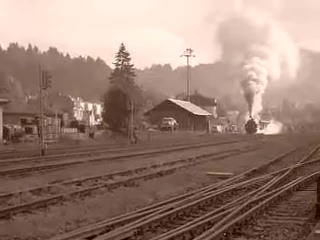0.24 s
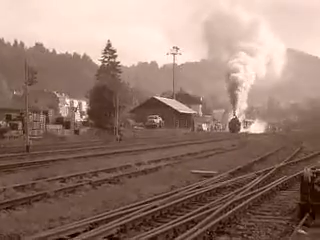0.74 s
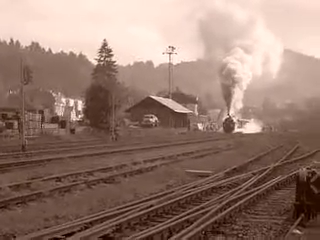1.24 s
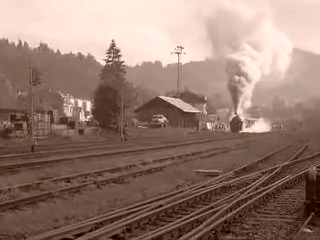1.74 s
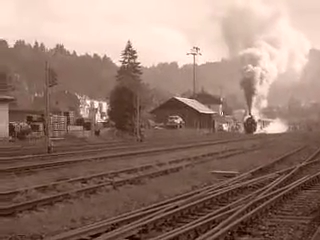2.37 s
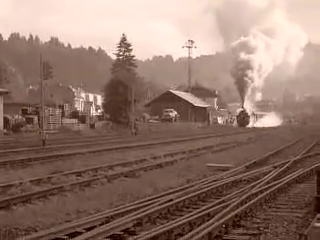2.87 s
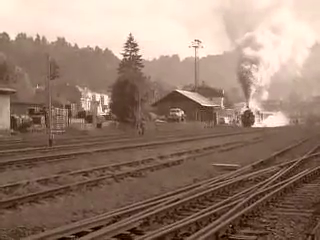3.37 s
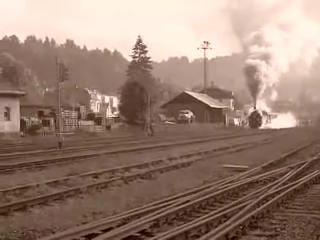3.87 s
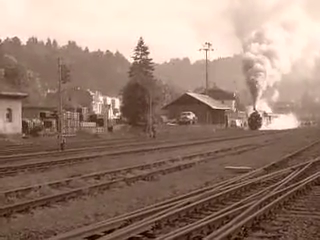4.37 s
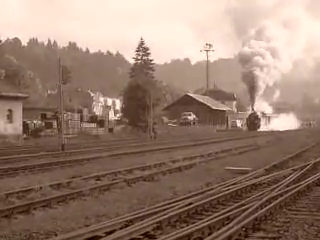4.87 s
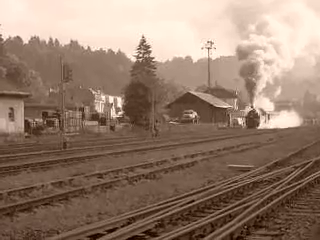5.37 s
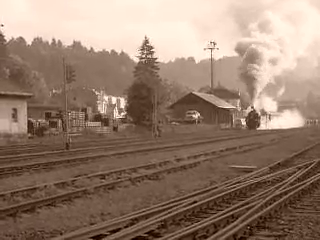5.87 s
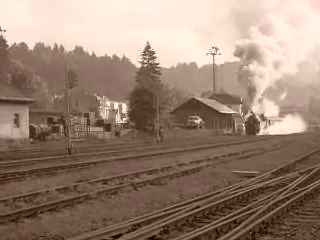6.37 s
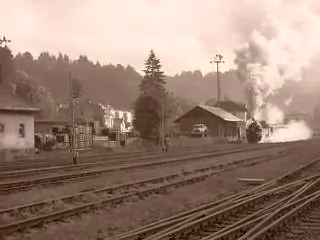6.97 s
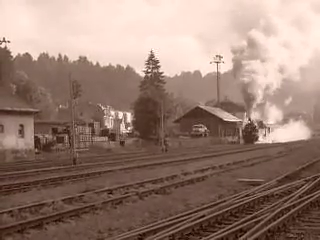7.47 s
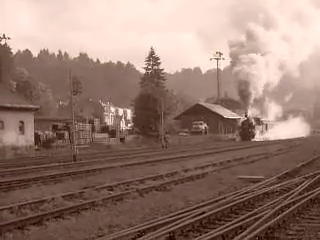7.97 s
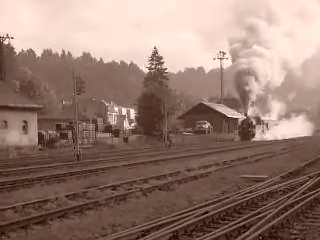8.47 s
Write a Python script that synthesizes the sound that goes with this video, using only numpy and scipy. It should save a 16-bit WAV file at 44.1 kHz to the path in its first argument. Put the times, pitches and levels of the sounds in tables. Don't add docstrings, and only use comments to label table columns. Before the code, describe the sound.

From 0 s a steam locomotive is already working some way off in an open rail yard, heard through a thin-sounding mono camera microphone. Strong, ringing steam hiss centred near 3 kHz swells about every 0.9 s at first, with crests near 0.7, 1.5, 2.5 and 3.4 s, small spurts between, over constant seep. Underneath, blurred woolly chuffs beat just over four per second, quickening to nearly six, with low roar and slight echo. By 3-5 s the jets are clearly stronger; faint low firebox drumming and flue notes stay buried. After 5.4 s the hiss changes colour as the far-side jet emerges, its hollow notches sliding slowly downward. Surges come every 0.75 s, with tiny ticks near 5.9, 6.1 and 7.2 s. From 7 s it grows wider, fizzier and loudest, a faint moan below. A brief, falling leak whistle near 1.4 kHz appears at 8.6 s, ending mid-approach at 8.7 s.

```python
import sys
import numpy as np
from scipy import signal
from scipy.fft import rfft, irfft, next_fast_len
from scipy.io import wavfile
from scipy.ndimage import uniform_filter1d

SR = 44100
rng = np.random.default_rng(int(sys.argv[2]) if len(sys.argv) > 2 else 0)


def invert_db(level):
    return 10 ** (np.asarray(level, dtype=float) / 20)


def unload_wav(signal):
    wavfile.write(
        sys.argv[1],
        SR,
        np.round(np.clip(np.atleast_2d(signal).T, -1, 1) * 32767).astype(np.int16),
    )


N = 384993

# time in seconds, gain over the start in dB.
APPROACH = [(0, -1.5), (.6, 1), (2.5, 2.5), (4.2, 3.5), (6.6, 4.5), (7.2, 6), (8.73, 8.5)]
JET_BANDS = [
    (2650, 3800),
    (1950, 2650),
    (4200, 6800),
    (7300, 10500),
]
# pitch in Hz, level in dB per Hz.
JET_COLOUR = [(1000, -56), (1700, -28), (2120, -26.5), (2540, -10), (2940, 3), (3240, 0.5), (3720, -13.5),
              (4150, -19), (4700, -23), (6070, -30), (7500, -39), (9400, -47.5), (10500, -57),
              (12100, -78.5), (14000, -120)]
# opening, crest and closing in seconds, core and shoulder level in dB.
STROKES = [(-0.45, -0.2, -0.06, -21.9, -43.2), (0.44, 0.7, 0.76, -20.1, -40.0),
           (1.34, 1.51, 1.68, -18.4, -39.8), (2.22, 2.5, 2.77, -19.1, -39.8),
           (3.07, 3.37, 3.54, -14.9, -35.5), (3.95, 4.15, 4.35, -13.2, -36.6),
           (4.72, 4.98, 5.04, -14.6, -35.7), (5.52, 5.72, 5.83, -15.6, -37.7),
           (6.3, 6.42, 6.59, -14.8, -35.1), (7.05, 7.1, 7.35, -14.2, -32.2),
           (7.76, 7.94, 8.06, -14.9, -31.9), (8.48, 8.67, 8.75, -14.8, -30.9)]
# crest in seconds, core level in dB.
SPURTS = [(0.28, -27.0), (1.22, -25.1), (1.87, -23.4), (2.1, -21.3), (2.97, -20.1), (3.82, -20.0),
          (4.63, -21.4), (5.4, -20.7), (6.17, -22.9), (6.89, -22.8), (7.63, -20.2), (8.35, -20.7)]
# opening, full flow and shutting in seconds,
# fizz level in dB, level of the spit at the end in dB.
LEAKS = [(0.44, 0.7, 1.12, -57.3, -75.0), (1.3, 1.56, 2.06, -54.4, -57.4), (2.18, 2.62, 2.92, -53.2, -52.9),
         (3.02, 3.49, 3.73, -50.1, -51.6), (3.95, 4.31, 4.54, -55.2, -54.7),
         (4.61, 5.14, 5.33, -53.8, -59.9), (5.53, 5.7, 6.1, -52.2, -62), (6.23, 6.55, 6.84, -51.5, -52.5),
         (6.97, 7.43, 7.58, -47.1, -44.1), (7.67, 8.14, 8.33, -43.9, -51.4),
         (8.37, 8.74, 8.8, -43.3, -58.5)]
# pitch in Hz, width in Hz.
FLANKS = [(2580, 150), (3850, 380)]
# time in seconds, share of the far-side jet 0-1, ground echo strength 0-1,
# pitch in Hz below which the boiler shades the far side.
GROUND = [(0, .05, .77, 9000), (4.6, .05, .85, 9000), (5.3, .08, .72, 9000), (5.42, .9, .7, 9000),
          (7.1, .93, .8, 6500), (7.6, .97, .8, 5200), (8.73, 1, .68, 4000)]
# time in seconds, near-side and far-side jet in Hz.
NOTCH_SPACING = [(0, 2910, 2800), (3, 2790, 2650), (4.6, 2645, 2550), (7, 2570, 2420), (8.73, 2480, 2245)]
# lateness in seconds, strength in dB, brightness in dB.
TURN_BEATS = [(-0.0056, -37.5, -0.5), (-.01, -38.5, -2), (0, -38, 0), (0, -39.5, -2)]
# pitch in Hz, level in dB per Hz.
BLAST_COLOUR = [(15, -53.5), (25, -26), (53, -18), (75, -15.5), (182, -15), (328, -17), (516, -5.5),
                (600, -6), (753, -2), (1020, -11), (1260, -5), (1460, -7), (1670, -12.5), (2090, -11.5),
                (2300, -8), (2990, -27.5), (5060, -120)]
# time in seconds, pitch in Hz, level in dB.
FIREBOX_DRONE = [(0, 50, -64), (1.53, 47, -66), (2.14, 47.5, -58), (2.33, 47, -70), (2.75, 48.5, -59),
                 (3.2, 48, -57), (3.5, 48, -67), (3.88, 48.5, -57), (4.1, 48, -69), (4.62, 51.9, -50),
                 (5.13, 51.2, -64), (5.4, 50.7, -54), (5.91, 50.8, -62), (6.95, 54.3, -57),
                 (7.5, 54.5, -63), (7.95, 55.4, -56), (8.73, 56.3, -59)]
# time in seconds, pitch in Hz, level in dB.
FLUE_NOTE = [(1.7, 237, -64), (2, 235.6, -57), (2.6, 231, -66.5), (3.1, 224.4, -55), (3.6, 224, -69.5),
             (4.4, 230.5, -60), (4.8, 227, -80)]
# time in seconds, peak in dB, lower part against the peak in dB.
TICKS = [(3.3505, -35, -8), (3.4256, -36, -8), (5.8556, -31, 4), (6.0888, -26, 7), (7.1552, -21, 5)]
# time in seconds, pitch in Hz, level in dB.
FLUE_MOAN = [(6.7, 190, -70), (6.9, 188, -59), (7.3, 172, -61), (7.7, 172, -61), (8.1, 183, -57),
             (8.73, 180, -56)]
# time in seconds, pitch in Hz, level in dB.
LEAK_WHISTLE = [(8.58, 1470, -68), (8.61, 1480, -38), (8.67, 1450, -32), (8.73, 1410, -42.5)]


def evened(x):
    return x / np.sqrt(np.mean(x ** 2) + 1e-20)


def read(points, hz):
    f, value = np.transpose(points)
    return np.interp(np.log(hz + 1), np.log(f + 1), value)


def follow(rows, t):
    s, *columns = np.transpose(rows)
    return [np.interp(t, s, c) for c in columns]


def nearing(t):
    return follow(APPROACH, t)[0]


def coloured(gain_at):
    hz = np.fft.rfftfreq(N, 1 / SR)
    return evened(irfft(rfft(rng.standard_normal(N)) * gain_at(hz), N))


def resonate(x, hz, width):
    turn = np.exp(2j * np.pi * np.cumsum(hz) / SR)
    r = np.exp(-np.pi * width / SR)
    return 2 * (turn * signal.lfilter([1 - r], [1, -r], x / turn)).real


def whistle(rows, width):
    t = np.arange(N) / SR
    hz, db = follow(rows, t)
    tone = resonate(resonate(rng.standard_normal(N), hz, width), hz, width)
    return invert_db(db) * evened(tone) * (t >= rows[0][0])


def swell(t, opens, crest, closes, db, start_db, sag, fall, open_s=.143):
    shape_db = start_db * np.clip((crest - t) / max(crest - opens, .02), 0, 1)
    shape_db = shape_db - sag * np.clip(t - crest, 0, None)
    shape_db = shape_db - fall * np.clip(t - closes, 0, None)
    opening = np.clip((t - opens) / open_s + .5, 0, 1) ** 2
    return opening * invert_db(2 * (db + shape_db))


def leak(t, opens, full, shuts, db, spit_db, spit_s=.021):
    spit = invert_db(2 * spit_db) * np.exp(-((t - shuts + spit_s) / spit_s) ** 2)
    return swell(t, opens, full, shuts, db, -6.9, 11.9, 90, open_s=.174) + spit


def valves(t):
    near_db = nearing(t)
    # level in dB, dB gained per dB of nearing
    seep = (-31, 1.4), (-38.5, 1.3), (-48.3, 1.5), (-64.5, 1.5)
    core, skirt, shoulder, fizz = (invert_db(2 * (db + k * near_db)) for db, k in seep)
    main = sum(swell(t, *s, db, -3.2, 15.3, 26.8) for *s, db, _ in STROKES)
    wide = sum(swell(t, *s, db, -4.25, 2.1, 30.2) for *s, _, db in STROKES)
    spurts = sum(invert_db(2 * db) * np.exp(-((t - s) / .07) ** 2) for s, db in SPURTS)
    leaks = sum(leak(t, *row) for row in LEAKS)
    skirt = skirt + main ** .45 * invert_db(2 * (-29 + 1.45 * near_db)) + spurts * invert_db(2 * -11.5)
    shoulder = shoulder + wide + spurts * invert_db(2 * -25.1)
    return 10 * np.log10([core + main + spurts, skirt, shoulder, fizz + leaks])


def jet_levels(t, hz, colour):
    core_db, skirt_db, shoulder_db, fizz_db = valves(t)
    skirt_db, shoulder_db, fizz_db = skirt_db - core_db, shoulder_db - core_db, fizz_db - core_db
    held_db = [10 * np.log10(np.sum(colour[(hz > lo) & (hz < hi)] ** 2)) for lo, hi in JET_BANDS]
    f = hz[:, None]
    lower = np.clip((2800 - f) / 400, 0, 1)
    upper = np.clip((f - 3850) / 550, 0, 1)
    top = np.clip((f - 6600) / 900, 0, 1)
    level_db = core_db - held_db[0] + (upper - top) * (shoulder_db + held_db[0] - held_db[2])
    level_db += top * (fizz_db + held_db[0] - held_db[3])
    level_db += lower * (skirt_db + held_db[0] - held_db[1])
    thinning = np.clip((3750 - f) / 450, 0, 1) * np.clip((f - 2150) / 300, -.8, 1)
    sing = np.exp(-((f - 3150) / 190) ** 2) - .5 * thinning
    level_db += .5 * np.clip(-skirt_db - 8, 0, None) * sing
    flanks = sum(np.exp(-((f - centre) / width) ** 2) for centre, width in FLANKS)
    level_db += .6 * np.clip(nearing(t) - 3.5, 0, None) * flanks
    return level_db


def comb(hz, spacing, turns, echo):
    ripple = np.cos(2 * np.pi * (hz / spacing - turns))
    return (1 - 2 * echo * ripple / (1 + echo ** 2)) ** .5


def ground_echo(t, hz):
    near_turns, far_turns = .59, .25
    f = hz[:, None]
    share, echo, shade_hz = follow(GROUND, t)
    share = share * np.clip(f / shade_hz, 0, 1)
    near_hz, far_hz = follow(NOTCH_SPACING, t)
    near = comb(f, near_hz, near_turns, echo)
    far = comb(f, far_hz, far_turns, echo)
    turn = 2 * np.pi * (f / near_hz - near_turns)
    lean = np.sin(turn) + .7 * np.sin(2 * turn - .9)
    near = near * invert_db(1.8 * lean * (f > 3500))
    return (1 - share) * near + share * far


def drain_cock_jets(patchy_db=1.0, flicker_db=0.27):
    frames = N // 128 + 5
    hz = np.fft.rfftfreq(512, 1 / SR)
    t = np.arange(frames) * 128 / SR
    colour = invert_db(read(JET_COLOUR, hz))
    level_db = jet_levels(t, hz, colour)
    a, b, patches = rng.standard_normal((frames, len(hz), 3)).T
    patches = uniform_filter1d(patches, size=7, axis=0)
    patches = evened(uniform_filter1d(patches, size=24, axis=1))
    flicker = evened(uniform_filter1d(rng.standard_normal(frames), size=6))
    gain = invert_db(level_db + patchy_db * patches + flicker_db * flicker)
    z = (a + 1j * b) * colour[:, None] * np.sqrt(ground_echo(t, hz)) * gain
    return invert_db(1.5) * signal.istft(z, nperseg=512, noverlap=384)[1][:N]


def chuffs(first_s=.19, beats_per_s=4.19, speedup=.1817, scatter_db=.4):
    k = np.arange(43)
    late, db, bright_db = np.array(TURN_BEATS)[k % len(TURN_BEATS)].T
    s = first_s + late + (np.sqrt(beats_per_s ** 2 + 2 * speedup * k) - beats_per_s) / speedup
    scatter = scatter_db * rng.standard_normal(len(k))
    return s, db + .42 * nearing(s) + scatter, bright_db


def blast(lo, hi):
    return coloured(lambda hz: invert_db(read(BLAST_COLOUR, hz)) * (hz >= lo) * (hz < hi))


def chimney(rise=0.0056, t60=0.54, echo_s=0.035, echo_db=-11.0):
    t = np.arange(N) / SR
    age = t[:SR]
    puff = (1 - np.exp(-age / rise)) ** 2 * invert_db(-60 * age / t60)
    s, db, bright_db = chuffs()
    beats = np.zeros((2, N))
    beats[:, (s * SR).astype(int)] = invert_db([db - bright_db / 2, db + bright_db / 2])
    beats[:, 0] = invert_db(-41.0)
    power = signal.oaconvolve(beats ** 2, puff[None] ** 2, axes=1)[:, :N]
    late = round(echo_s * SR)
    power[:, late:] += invert_db(2 * echo_db) * power[:, :-late]
    roar_db = -40.2 + 1.1 * nearing(t)
    heave = np.sqrt(abs(power) + invert_db(2 * (roar_db - 4.5)))
    deep = np.sqrt(invert_db(-31.5) * abs(power[0]) + invert_db(2 * (roar_db - 14 - 2.0)))
    low, body, edge = blast(0, 350), blast(350, 1000), blast(1000, 2600)
    return deep * low + invert_db(-1.0) * heave[0] * body + heave[1] * edge


def firebox_drone():
    hz, db = follow(FIREBOX_DRONE, np.arange(N) / SR)
    waver = evened(uniform_filter1d(rng.standard_normal(N), size=4000))
    return invert_db(db) * np.sqrt(2) * np.sin(2 * np.pi * np.cumsum(hz + .8 * waver) / SR)


def flue_note():
    return whistle(FLUE_NOTE, 10.0)


def high_ticks():
    out = np.zeros(N)
    age = np.arange(64) / SR
    for s, db, lower_db in TICKS:
        high = np.sin(2 * np.pi * 9800 * age) * np.exp(-((age - .0003) / .0002) ** 2)
        lower = np.sin(2 * np.pi * 5600 * age) * np.exp(-((age - .0003) / .00013) ** 2)
        out[round(s * SR) + 55:][:64] += invert_db(db) * (high + invert_db(lower_db) * lower)
    return out


def flue_moan():
    return whistle(FLUE_MOAN, 22.0)


def leak_whistle():
    return whistle(LEAK_WHISTLE, 100.0)


def scene():
    steam = drain_cock_jets() + chimney()
    tones = firebox_drone() + flue_note() + flue_moan() + leak_whistle()
    return (steam + tones + high_ticks())[None]


def low_pass(x):
    return signal.sosfilt(signal.butter(12, 12110, fs=SR, output="sos"), x)


def record(dry):
    height = abs(signal.hilbert(dry, next_fast_len(N))[:, :N])
    height = uniform_filter1d(height, size=31)
    held = dry / (1 + (height / .74) ** 8) ** .125
    thin = signal.lfilter(*signal.butter(1, 30, "high", fs=SR), held)
    band_limit = signal.firwin(101, 11900, window=("kaiser", 9), fs=SR)
    return low_pass(signal.oaconvolve(thin, band_limit[None], "same"))


dry = scene()
out = record(dry)
unload_wav(out)
```